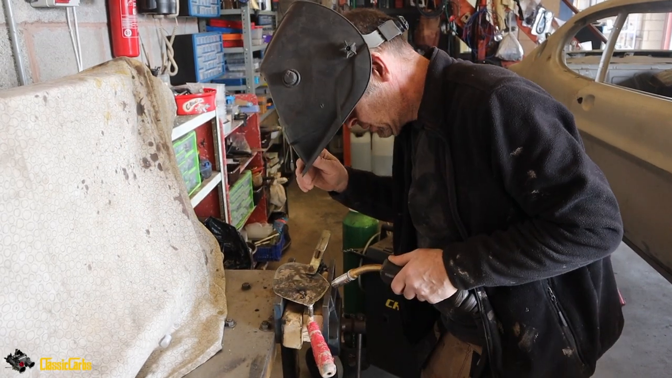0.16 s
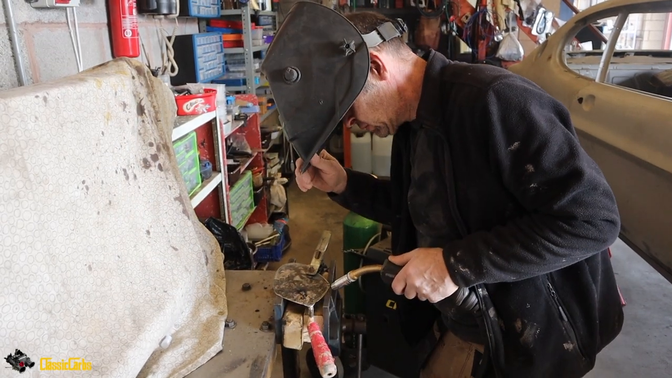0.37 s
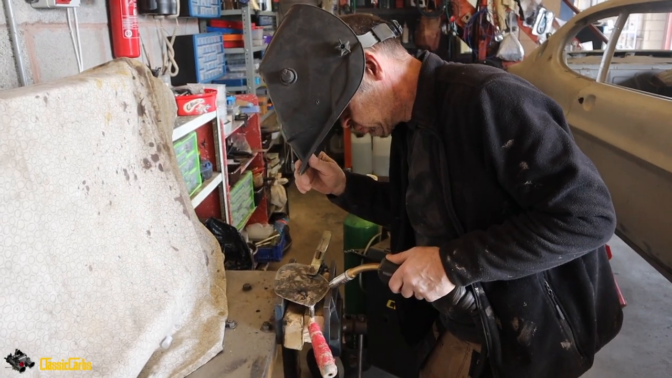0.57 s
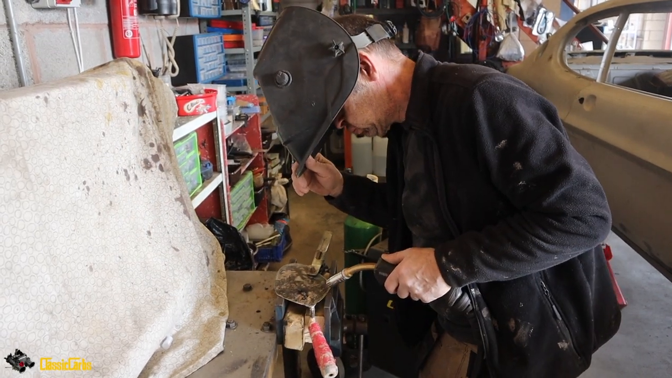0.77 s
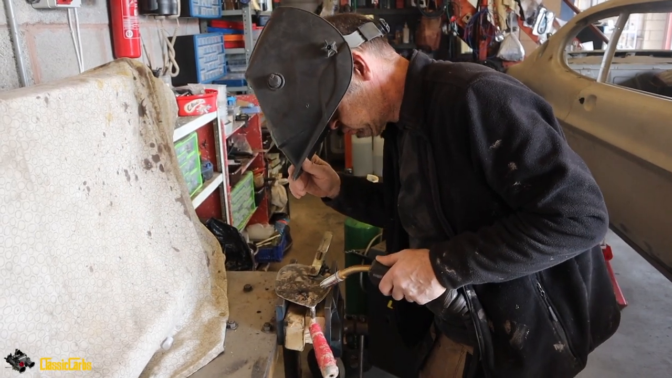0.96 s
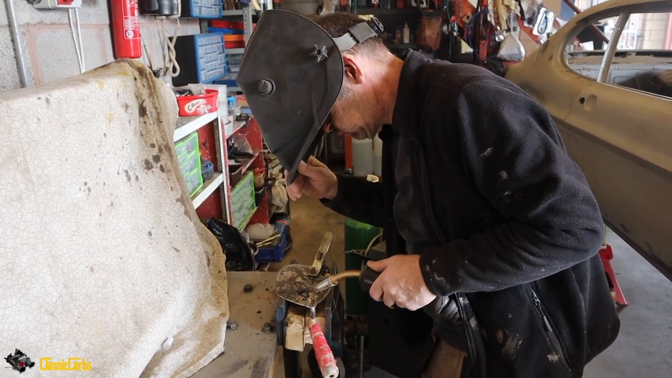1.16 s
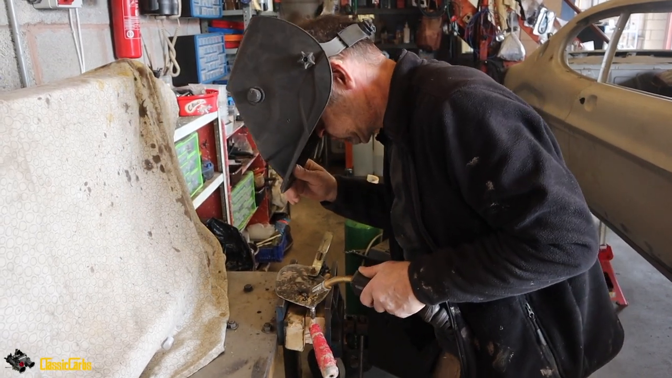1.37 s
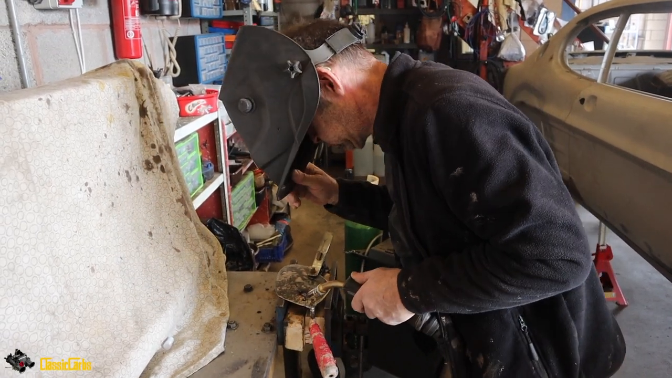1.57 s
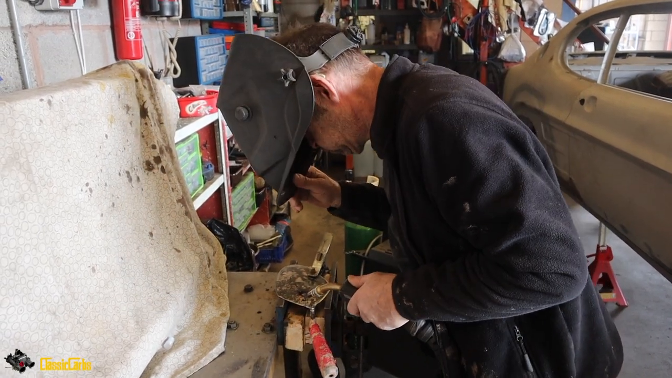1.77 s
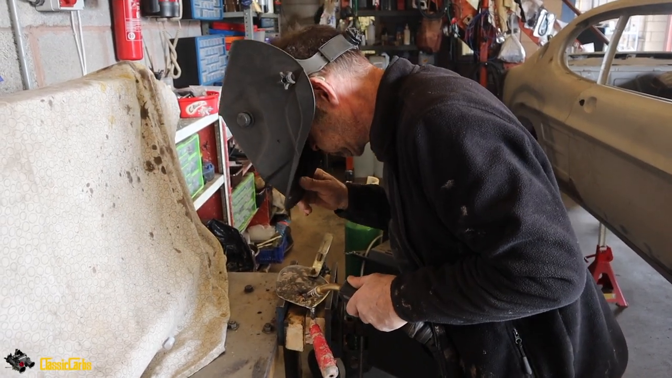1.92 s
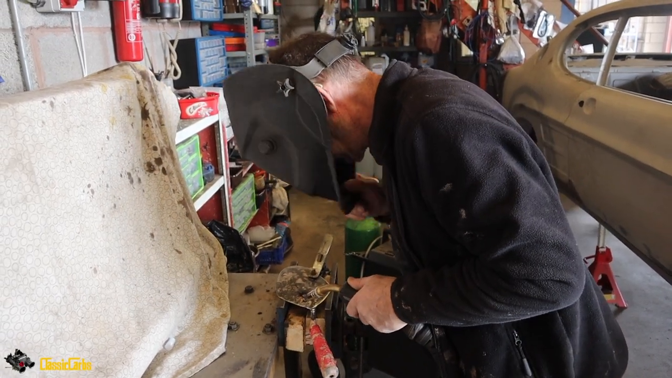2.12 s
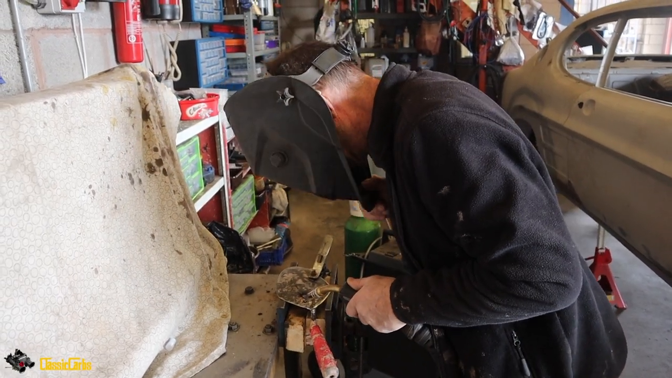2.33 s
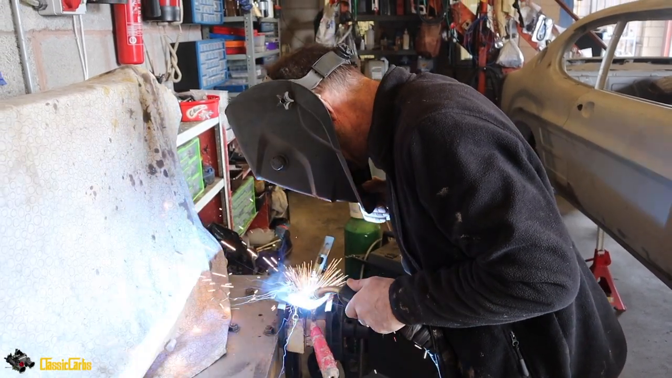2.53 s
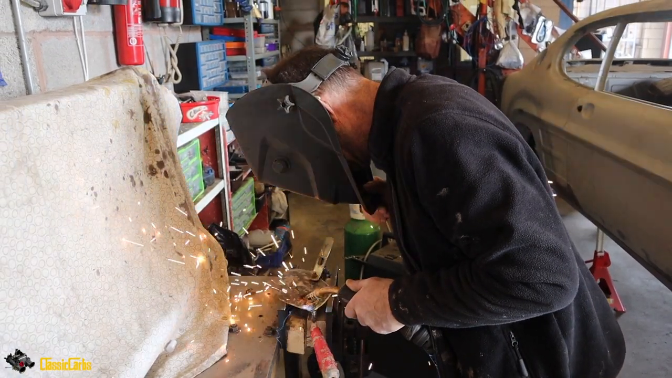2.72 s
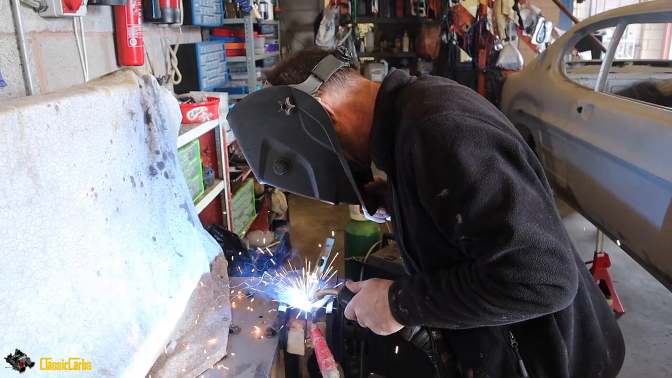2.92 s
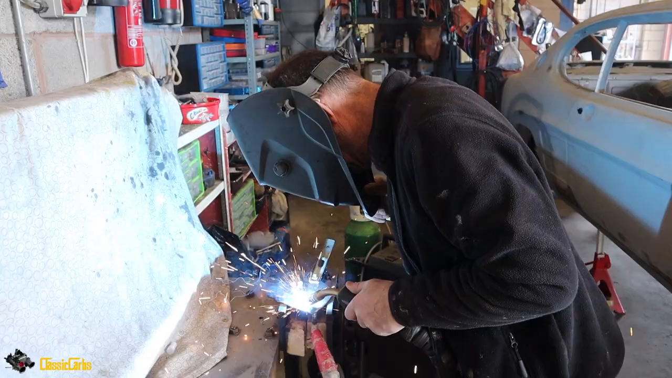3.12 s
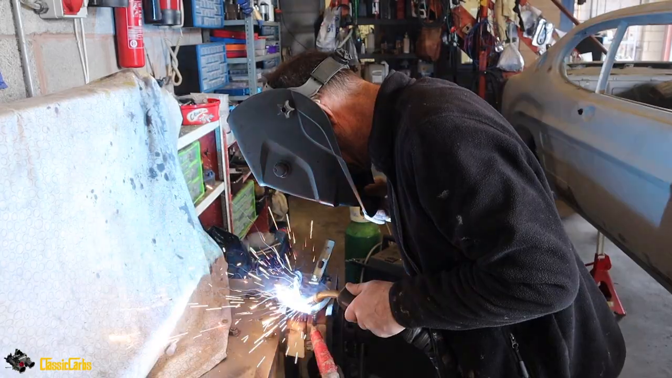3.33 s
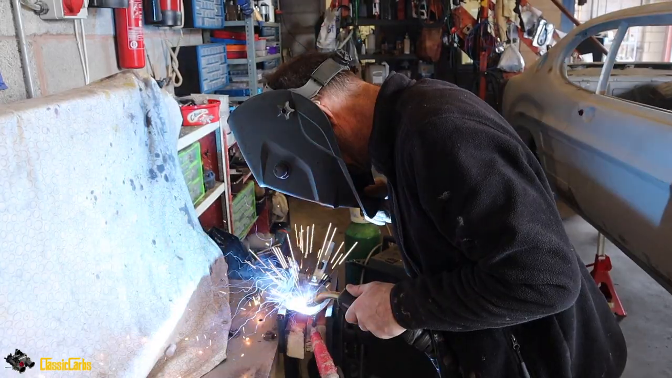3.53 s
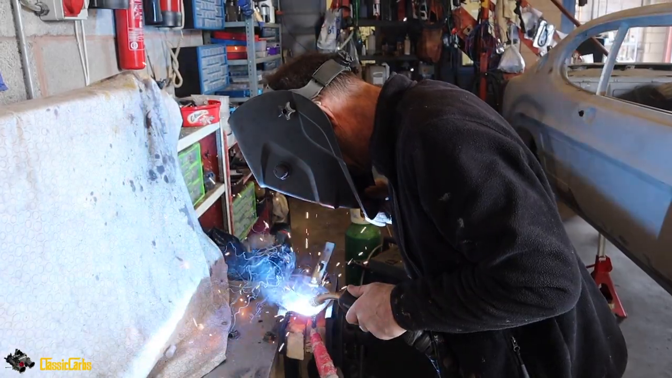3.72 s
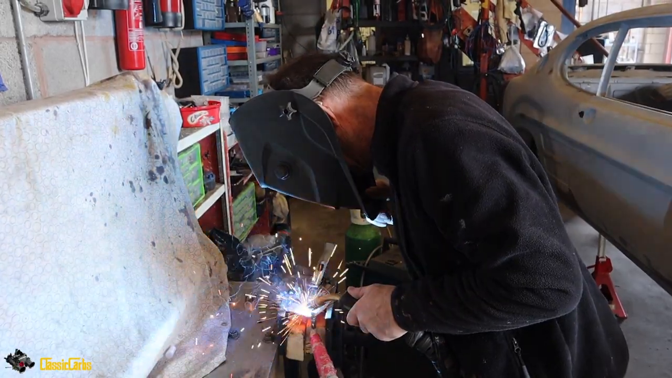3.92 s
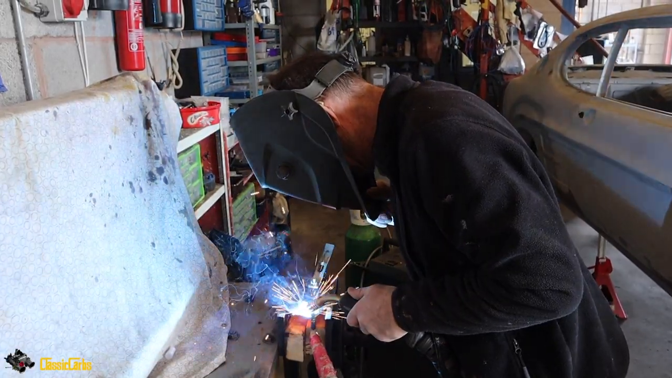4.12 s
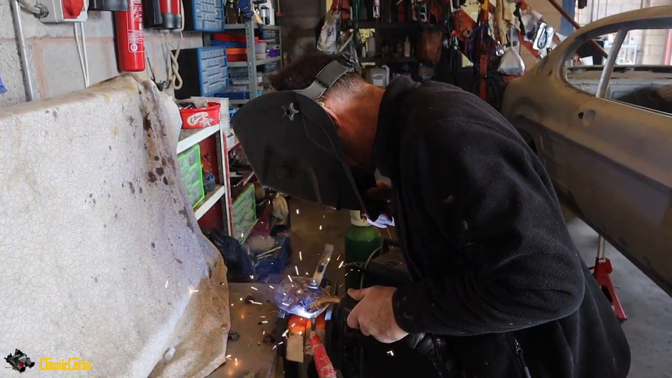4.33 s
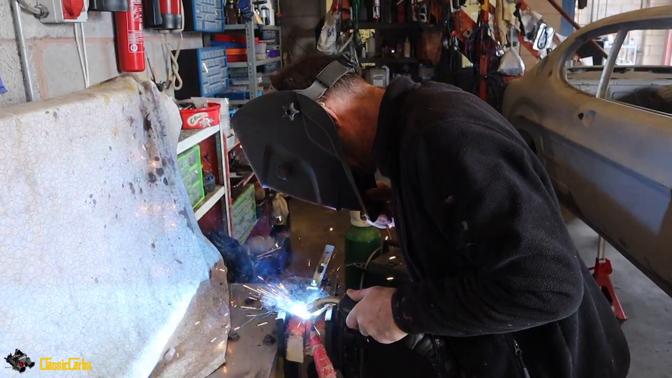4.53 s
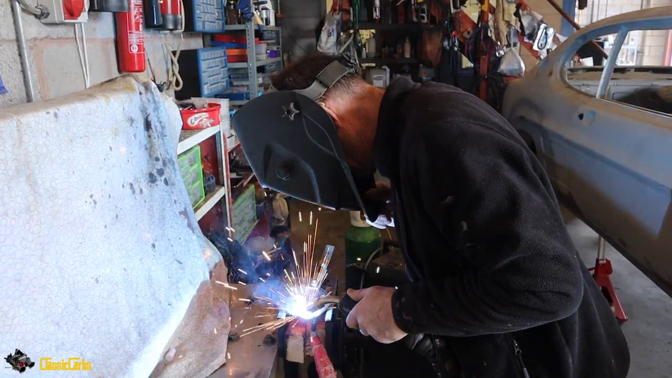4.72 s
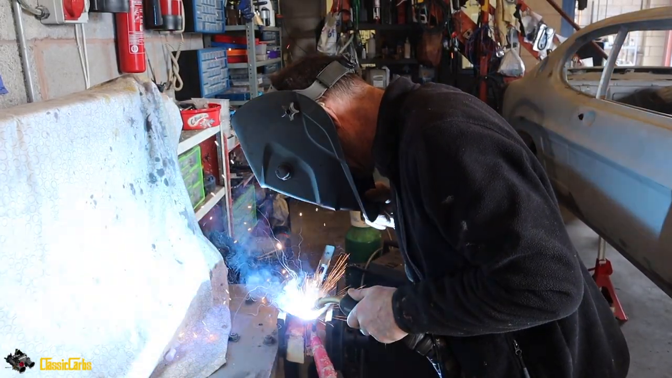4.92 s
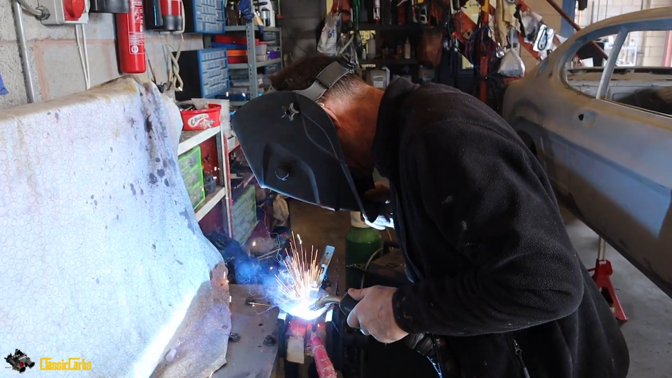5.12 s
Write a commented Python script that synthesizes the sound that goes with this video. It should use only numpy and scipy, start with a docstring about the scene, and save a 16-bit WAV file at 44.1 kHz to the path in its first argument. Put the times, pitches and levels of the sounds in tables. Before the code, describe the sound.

From the start, a wire-feed welder's cooling fan gives a steady rush of air over a low electrical hum in a garage. The welding wire touches the metal with light, high ticks and tiny scrapes at about 0.3, 0.7 and 1 second, then faintly again between 1.6 and 1.9 seconds. A small, dull, hollow knock comes at 2.1 seconds, followed by sharper ticks and a brief drag of the wire. At about 2.4 seconds the arc strikes, much louder: a few hard pops quickly tighten into fast, irregular crackling over a grainy sizzle. The fan ducks far into the background. The welding sputters unevenly, with short hissing spits and a stronger run of pops around 4.4 to 4.6 seconds, and continues to the end just after 5 seconds. The sound is close and bright with very little echo, and the biggest pops distort slightly.

```python
"""A wire-feed welder in a cluttered garage. From the start its cooling fan rushes and hums.
The wire ticks against the work a few times; a dull knock follows, then the wire drags briefly.
At about 2.4 s the arc strikes: each molten drop shorts it with a small tick, and it relights with
a loud pop over a sizzle. The pops overload the recorder, whose gain control pulls the fan down.
Popping and spitting go on to the end."""
import sys
import numpy as np
from scipy import signal
from scipy.fft import rfft, irfft, next_fast_len
from scipy.io import wavfile
from scipy.ndimage import uniform_filter1d

SR = 44100
rng = np.random.default_rng(int(sys.argv[2]) if len(sys.argv) > 2 else 0)


def transcribe(u):
    """Save the signal u as a 16-bit wav file named by the first command-line argument.

    u: samples, shape (n,) or (channels, n), limited to [-1, 1]; the rate is SR.
    q: integer samples, one column per channel.
    """
    v = np.clip(np.atleast_2d(u).T, -1, 1)
    q = np.round(v * 32767).astype(np.int16)
    wavfile.write(sys.argv[1], SR, q)


N = 228694
TIME = np.arange(N) / SR


def from_db(db):
    return 10 ** (np.asarray(db) / 20)


def rms_one(x):
    return x / np.sqrt(np.mean(x ** 2) + 1e-20)


def level_curve(rows):
    """Join (time [s], level [dB]) points: silent before the first, steady after the last."""
    times, db = np.transpose(rows)
    return from_db(np.interp(TIME, times, db, left=-200))


def drift(rate_hz):
    """A smooth random wobble of about 1 either way."""
    r = np.exp(-80 * np.pi * rate_hz / SR)
    slow = signal.lfilter([1], [1, -2 * r, r * r], rng.standard_normal(N // 40 + 2002))[2000:]
    return np.interp(np.arange(N) / 40, np.arange(len(slow)), rms_one(slow))


def clicks(times, sizes):
    """Clicks one sample long."""
    out = np.zeros(N)
    np.add.at(out, np.clip(np.round(np.asarray(times) * SR).astype(int), 0, N - 1), sizes)
    return out


def ring(x, hz, t60):
    """Make x ring at one pitch; the ring time t60 is the seconds it takes to fade by 60 dB."""
    r, w = np.exp(-np.log(1000) / (t60 * SR)), 2 * np.pi * hz / SR
    return signal.lfilter([1, -r * np.cos(w)], [1, -2 * r * np.cos(w), r * r], x + 1e-18)


def band(x, low_hz, high_hz):
    """Keep the sound between two frequencies."""
    return signal.sosfilt(signal.butter(2, [low_hz, high_hz], "band", fs=SR, output="sos"), x)


def shaped_noise(spectrum):
    """Noise of strength 1 whose tone follows (frequency [Hz], level [dB]) points."""
    size = next_fast_len(N)
    hz, db = np.transpose(spectrum)
    shape_db = np.interp(np.log(np.arange(1, size // 2 + 2) * SR / size), np.log(hz), db)
    return rms_one(irfft(rfft(rng.standard_normal(size)) * from_db(shape_db), size)[:N])


# The fan's rush of air and its thin hiss, each: (frequency [Hz], level [dB])
AIR_SPECTRUM = [(15, -48), (25, -4.5), (75, -15), (102, -17), (156, -17), (229, -2.5), (337, -13.5),
                (393, -9), (601, -14), (687, -10.5), (954, -21), (1300, -12.5), (1430, -22.5),
                (1800, -24.5), (2500, -34), (3250, -71), (5500, -120)]
HISS_SPECTRUM = [(1500, -18.5), (2200, 2.5), (5600, -4.5), (6500, -15), (11000, -17), (12000, -22),
                 (13000, -21), (16300, -19)]
# Mains hum swelling and fading: (time [s], level [dB])
HUM_LEVELS = [(0.0, -58.5), (0.63, -51), (0.74, -48.5), (1.27, -46.5), (1.34, -50), (1.81, -63), (1.9, -48),
              (2.02, -41), (2.22, -49.5), (2.44, -43.5), (2.8, -45), (2.9, -65)]
# Blade tone, motor tone and a thin whine: (pitch [Hz], level of each multiple of the pitch [dB])
FAN_TONES = [(224.55, [-52, -43, -43, -56, -70, -53, -60, -53, -61, -57, -62]), (393.1, [-42, -50, -55]),
             (15000, [-73])]


def fan():
    """Moving air rushes and hisses over mains hum, while the blades and motor add wavering tones."""
    out = from_db(-35 + 1.26 * drift(12.5)) * shaped_noise(AIR_SPECTRUM)
    out += from_db(-46 + .2 * drift(22)) * shaped_noise(HISS_SPECTRUM)
    out += np.sqrt(2) * level_curve(HUM_LEVELS) * np.sin(2 * np.pi * 100.5 * TIME + .6 * drift(5))
    for hz, levels in FAN_TONES:
        for multiple, db in enumerate(levels, start=1):
            phase = 2 * np.pi * (multiple * hz * TIME + rng.random()) + .5 * drift(5)
            out += np.sqrt(2) * from_db(db - .5 + 1.16 * drift(1.8)) * np.sin(phase)
    return out


# Echoes off surfaces near the weld: (delay [ms], share of the direct sound [negative = flipped])
NEAR_ECHOES = [(.18, .33), (.52, -.07), (.82, .08), (1.05, -.07), (1.5, .04), (4.81, .09), (6.24, .11)]


def garage(x, t60=.053, dull_above_hz=6060):
    """Nearby surfaces throw back a few echoes, then a dull tail dies away."""
    t = np.arange(SR // 2) / SR
    delay_ms, share = np.transpose(NEAR_ECHOES)
    direct_and_echoes = (clicks([0], 1) + clicks(delay_ms / 1000, share))[:len(t)]
    tail = rng.standard_normal(len(t)) * from_db(-60 * t / t60) * (t > .002)
    tail = signal.lfilter(*signal.butter(1, dull_above_hz, fs=SR), tail)
    tail = from_db(-18.5) * tail / np.sqrt(np.sum(tail ** 2))
    return signal.fftconvolve(x, direct_and_echoes + tail)[:N]


def knock(time_s=2.082):
    """One dull, hollow knock: a muffled click that rings briefly."""
    click = clicks([time_s], from_db(-19))
    muffled = band(band(click, 420, 1000), 420, 1000)
    return ring(muffled, hz=740, t60=.045)


# The wire touches the work:
# (time [s], scrape level [dB], scrape length [ms], ring level [dB], brightness [dB])
WIRE_TOUCHES = [(0.321, -36.5, 37, -70, -1), (0.345, -37, 37, -70, 0), (0.7123, -24.5, 5.4, -18.5, 3.5),
                (.9294, -55, 3, -54, 1), (0.9629, -34, 7.9, -21.5, 3), (1.5755, -36, 5, -57, 1),
                (1.6596, -39, 8.9, -60, 2), (1.685, -50, 30, -70, 1), (1.922, -40, 30, -31.5, 0.5),
                (1.963, -55, 3, -49, 7), (2.2104, -41, 8, -59.5, 5.5), (2.2447, -20.5, 24, -48, 0.5),
                (2.25, -35, 26, -33, 15), (2.315, -44, 4.4, -54, -1), (2.354, -26, 6, -49, 8),
                (2.4116, -27, 14, -32, 17)]
# The notes that wire and nozzle ring at: (pitch [Hz], level [dB], ring time [s])
WIRE_NOTES = [(3750, -10, .04), (5100, -8, .05), (5870, -11, .045), (7200, -12, .11), (8700, -19, .08),
              (10100, -21, .055), (11890, -2, .033), (13300, -11, .025), (15000, -18, .03)]


def wire_ticks():
    """Each touch is a short scrape that sets the wire and nozzle ringing."""
    out = np.zeros(N)
    t = np.arange(SR // 10) / SR
    for start_s, scrape_db, scrape_ms, ring_db, bright_db in WIRE_TOUCHES:
        noise = rng.standard_normal((2, len(t)))
        top_hz = 16000 if bright_db > .5 else 7000
        touch = from_db(scrape_db - 20000 * t / scrape_ms) * band(noise[0], 2000, top_hz)
        rub = from_db(ring_db - 3.5 - 4000 * t) * noise[1]   # uneven contact drives each note differently
        for hz, note_db, t60 in WIRE_NOTES:
            touch += from_db(note_db - 16.5 + 1.5 * bright_db * np.log2(hz / 8000)) * ring(rub, hz, t60)
        start = round(start_s * SR)
        out[start:start + len(t)] += touch
    return out


# How hard the wire rubs just before the arc strikes: (time [s], level [dB])
DRAG_LEVELS = [(2.305, -60), (2.316, -39), (2.335, -43), (2.36, -33.5), (2.375, -42), (2.395, -50)]


def wire_drag():
    """The wire drags on the work and rings at two high pitches."""
    rub = level_curve(DRAG_LEVELS) * (TIME < DRAG_LEVELS[-1][0]) * rng.standard_normal(N)
    return from_db(-16) * ring(rub, hz=5870, t60=.02) + from_db(-22) * ring(rub, hz=11900, t60=.012)


# The steady burn of the arc under the pops: (time [s], level [dB])
BURN_LEVELS = [(2.409, -45), (2.44, -40), (2.6, -31.5), (2.72, -38), (2.85, -50), (3.0, -32), (3.25, -49),
               (3.45, -39), (3.6, -36.5), (3.8, -36), (3.9, -35.5), (4.25, -43), (4.42, -36.5), (4.62, -36),
               (4.9, -47), (5.0, -40), (5.18, -43)]


def burn_strength(swell_db_per_s=159, longest_swell_s=.11, flare_fade_s=.028):
    """While no drop falls the arc lengthens and roars louder; each pop leaves it flaring."""
    pop_s, pop_db = np.transpose(ARC_POPS)
    last_lit_s = np.concatenate([[BURN_LEVELS[0][0]], pop_s])[np.searchsorted(pop_s, TIME)]
    swell = from_db(swell_db_per_s * np.clip(TIME - last_lit_s, 0, longest_swell_s))
    kicks = clicks(pop_s, from_db(pop_db - 42.5))
    flare = signal.lfilter([1], [1, -np.exp(-1 / (flare_fade_s * SR))], kicks)
    return level_curve(BURN_LEVELS) * swell + flare


def flutter(burn):
    """The arc's low flutter follows the burn, and is stronger before the first drop falls."""
    early_db = 14 * (TIME < ARC_POPS[0][0])
    strength = from_db(-57.5 + early_db + 2.5 * drift(45)) * (burn / from_db(-32)) ** 1.55
    return strength * rms_one(band(rng.standard_normal(N), 28, 1350))


# Spits of molten metal: (time [s], level [dB], length [ms])
METAL_SPITS = [(3.343, -32, 27), (3.576, -29, 17), (4.108, -27, 42), (4.383, -30, 14), (4.412, -21, 9.5),
               (4.431, -37, 15), (4.442, -17, 8.5), (4.552, -22, 6.1), (4.682, -36, 11), (4.985, -25.5, 85)]


def spit_strength():
    """Each spit is a surge in the sizzle that rises fast and dies away."""
    strength = np.zeros(N)
    for start_s, db, length_ms in METAL_SPITS:
        age = np.clip((TIME - start_s) * 4000 / length_ms, 0, 50)   # 1 at the peak, a quarter of the way in
        strength += from_db(db) * age * np.exp(1 - age)
    return strength


# The tone of the arc's sizzle: (frequency [Hz], level [dB])
SIZZLE_SPECTRUM = [(600, -12), (1000, -4.5), (1500, 4.5), (1900, -4), (3100, 7.5), (4400, 1.5), (5200, 7),
                   (5900, -7), (7000, 0), (8700, 2), (12200, -2), (16300, 5)]


def sizzle(burn, grains_per_s=2500):
    """The burning arc hisses, and spatter makes the hiss grainy."""
    grains = from_db(3.5 * np.minimum(rng.exponential(1, N), 4))
    grains *= rng.random(N) < grains_per_s / SR
    frying = np.sqrt(.5 + .6 * uniform_filter1d(grains ** 2, size=30) / np.mean(grains ** 2))
    flicker = from_db(1.8 * drift(50))
    return flicker * (burn + spit_strength()) * frying * shaped_noise(SIZZLE_SPECTRUM)


def gas_push(fade_s=.0007, low_cut_hz=45):
    """Heated gas shoves outward after each pop."""
    pop_s, pop_db = np.transpose(ARC_POPS)
    push = signal.lfilter([1], [1, -np.exp(-1 / (fade_s * SR))], clicks(pop_s, from_db(pop_db - 41.5)))
    return signal.lfilter(*signal.butter(1, low_cut_hz, "high", fs=SR), push)


# The arc relights after each short circuit: (time [s], level [dB])
ARC_POPS = [(2.4556, 14), (2.5007, 11), (2.5551, 12), (2.612, 11), (2.6392, 5), (2.6435, 3), (2.6691, -1),
            (2.679, 2), (2.6982, 5), (2.7059, 2), (2.7171, 4), (2.727, 2), (2.7372, 2), (2.7457, 2),
            (2.7552, -1), (2.7692, 0), (2.7822, 1), (2.7933, -2), (2.8197, 5), (2.8225, 1), (2.8288, 0),
            (2.856, -5), (2.861, 2), (2.8953, -3), (2.8983, -1), (2.9504, 11), (2.9772, 7), (2.988, 2),
            (2.9981, -4), (3.0015, 2), (3.0051, -2), (3.0253, 1), (3.0353, 1), (3.0441, -1), (3.0656, -3),
            (3.0714, -1), (3.0916, -1), (3.0991, 3), (3.119, 4), (3.1299, -2), (3.1361, -2), (3.1478, 3),
            (3.1696, 3), (3.1806, -1), (3.1895, -3), (3.2122, -2), (3.2276, -3), (3.243, 1), (3.2492, -1),
            (3.2643, 2), (3.2895, 6), (3.3078, 3), (3.3622, 9), (3.3802, 5), (3.3933, 4), (3.4128, -1),
            (3.4284, -4), (3.4373, -3), (3.4606, -6), (3.4831, 4), (3.5016, 0), (3.5153, 2), (3.5811, 2),
            (3.5857, 0), (3.5939, 9), (3.6168, 4), (3.6243, 0), (3.6281, 6), (3.6409, 2), (3.6449, 3),
            (3.6654, 0), (3.6874, -3), (3.7177, -4), (3.7502, 2), (3.7676, 8), (3.7883, 1), (3.832, 9),
            (3.862, 2), (3.8884, 5), (3.9116, 0), (3.9307, 2), (3.9494, 3), (3.9667, -2), (3.9851, -3),
            (3.9952, 0), (4.0143, 0), (4.0453, -2), (4.0812, 3), (4.1205, 8), (4.1431, 8), (4.1558, 9),
            (4.1701, 2), (4.1867, 0), (4.2036, -2), (4.2236, -5), (4.2448, -3), (4.2712, 1), (4.2913, -3),
            (4.3179, -2), (4.3516, 4), (4.4398, -4), (4.4499, 11), (4.475, 8), (4.4828, 9), (4.5112, 6),
            (4.5446, 3), (4.5871, 10), (4.5955, 6), (4.6052, 9), (4.6185, 6), (4.6317, 10), (4.6415, 1),
            (4.649, 3), (4.6691, 2), (4.6831, -2), (4.6874, 6), (4.7043, 0), (4.7201, -1), (4.7412, 0),
            (4.7621, 1), (4.7697, -2), (4.7871, -4), (4.8083, 2), (4.825, -4), (4.8441, -3), (4.8527, -2),
            (4.871, 2), (4.891, 2), (4.9127, -3), (5.0108, 10), (5.0375, 1), (5.0647, 4), (5.0906, 5),
            (5.1131, 3), (5.1343, 3), (5.1563, 1), (5.1796, 2)]
# Nozzle, work and microphone openings ring after each pulse: (pitch [Hz], level [dB], ring time [s])
POP_NOTES = [(1330, -28, .0039), (1600, -31, .006), (2450, -33, .006), (3110, -20, .0062),
             (3910, -23.5, .009), (4930, -22, .007), (5270, -20.5, .007), (7400, -27, .003),
             (8580, -14, .0027), (9500, -24, .003), (12100, -20, .002), (13190, -5, .0007)]


def ticks_and_pops(typical_short_s=.00165):
    """A drop shorts the arc with a tick; it relights with a pop, a pulse in the opposite direction."""
    pop_s, pop_db = np.transpose(ARC_POPS)
    chance = rng.standard_normal((len(pop_s), 2))
    tick_s = pop_s - typical_short_s * np.exp(.25 * chance[:, 0])
    wait_s = np.diff(pop_s, prepend=BURN_LEVELS[0][0])
    # A tick is louder before a big pop and softer after a long wait.
    tick_db = -13.5 + .55 * pop_db - 3 * np.log2(wait_s / .02) + 4.5 * chance[:, 1]
    times = np.concatenate([pop_s, tick_s])
    sizes = np.concatenate([-from_db(pop_db), from_db(tick_db)])
    scatter_db = rng.normal(0, 2.5, (len(times), len(POP_NOTES)))   # no two pops ring alike
    heavy_db = .47 * np.clip(np.concatenate([pop_db, tick_db]), 0, 12)   # big pops shake the work harder
    crack = -from_db(-20.5) * signal.lfilter([1], [1, -.94], clicks(times, sizes))   # the gas rebounds
    for k, (hz, db, t60) in enumerate(POP_NOTES):
        note_db = db + scatter_db[:, k] + heavy_db * (2000 < hz < 6000)
        crack += ring(clicks(times, sizes * from_db(note_db)), hz, t60)
    return signal.lfilter(*signal.butter(1, 650, "high", fs=SR), crack)   # a small source gives little bass


def arc(growth_db_per_s=4):
    """Pops and sizzle from one spot, with a push and flutter that build as the molten pool grows."""
    burn = burn_strength()
    growth = from_db(growth_db_per_s * (TIME - ARC_POPS[0][0]))
    return from_db(15) * (ticks_and_pops() + sizzle(burn) + growth * (gas_push() + flutter(burn)))


def scene():
    """The fan, the handling noises and the echoing arc, in one channel."""
    return (fan() + knock() + wire_ticks() + wire_drag() + garage(arc()))[None]


def record(dry, threshold_db=-24, most_drop_db=15, recovery_db_per_s=2.5, top_hz=16400):
    """The recorder turns loud sound down and creeps back up; peaks clip and the highest treble is cut."""
    level_db = 10 * np.log10(signal.lfilter([.002], [1, -.998], dry[0] ** 2) + 1e-12)
    recovery_db = recovery_db_per_s * TIME
    held_db = np.maximum.accumulate(level_db + recovery_db) - recovery_db
    gain = from_db(-np.clip(held_db - threshold_db, 0, most_drop_db))
    mic = signal.lfilter(*signal.butter(2, 17500, fs=SR), dry)   # the microphone fades at the very top
    dip_hz, dip_width_hz = 10010, 360   # its housing cancels a narrow band
    mic -= signal.lfilter(*signal.iirpeak(dip_hz, dip_hz / dip_width_hz, fs=SR), mic)
    levelled = mic * gain
    clipped = levelled / (1 + np.abs(levelled / 1.05) ** 4) ** .25
    trimmed = signal.sosfiltfilt(signal.cheby2(8, 30, top_hz, fs=SR, output="sos"), clipped)
    return np.clip(trimmed, -1, 1)


dry = scene()
out = record(dry)
transcribe(out)
```